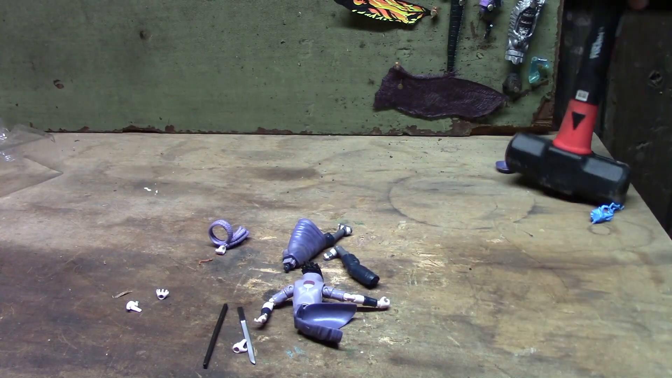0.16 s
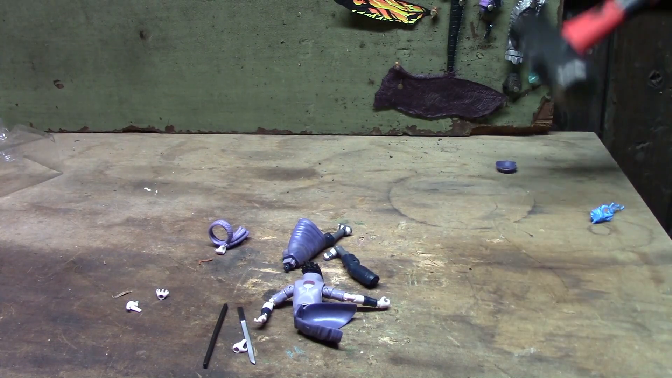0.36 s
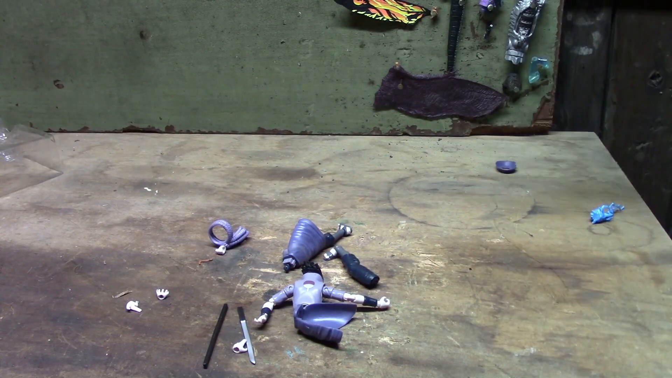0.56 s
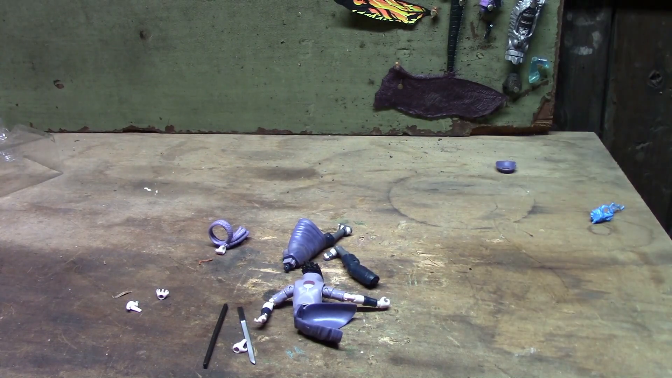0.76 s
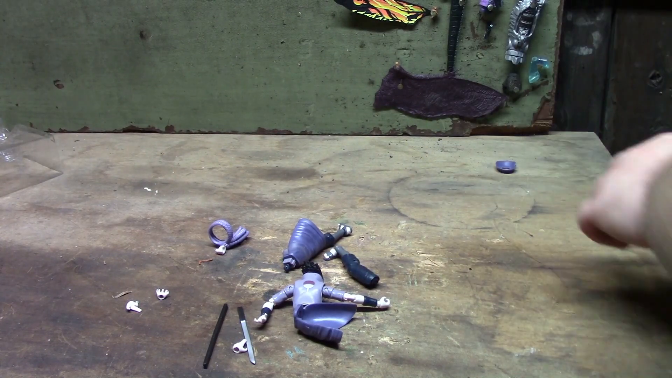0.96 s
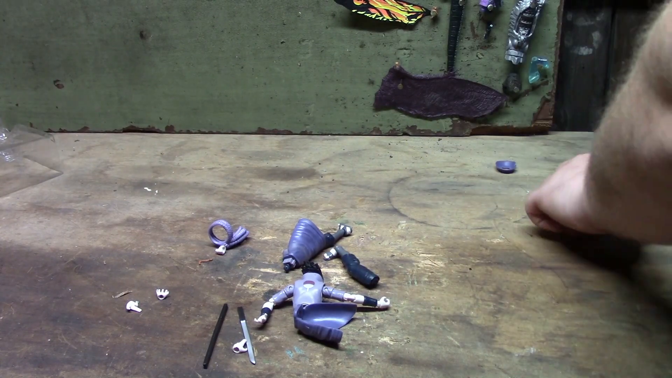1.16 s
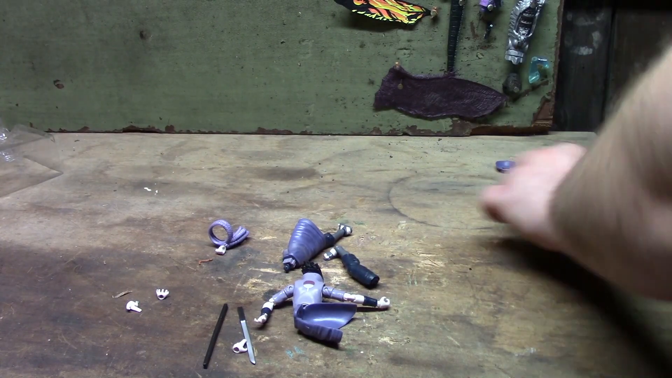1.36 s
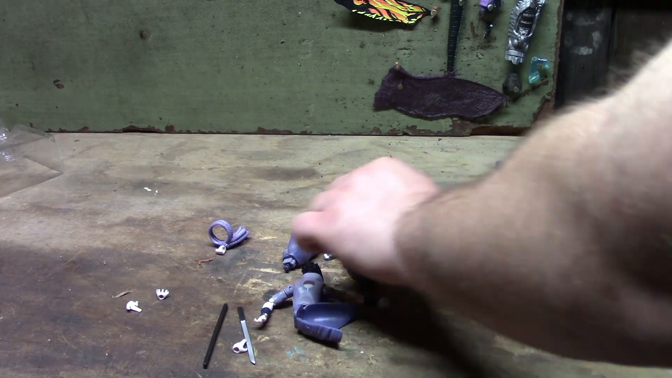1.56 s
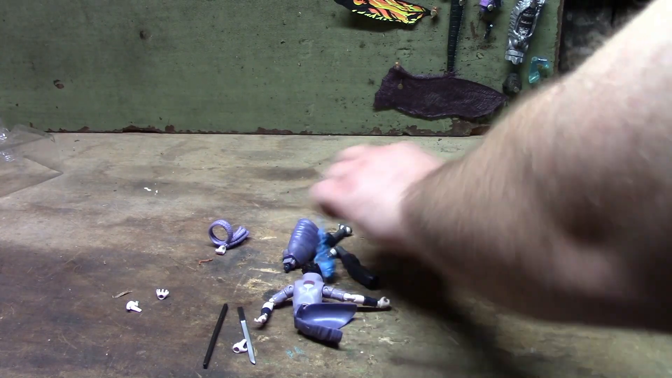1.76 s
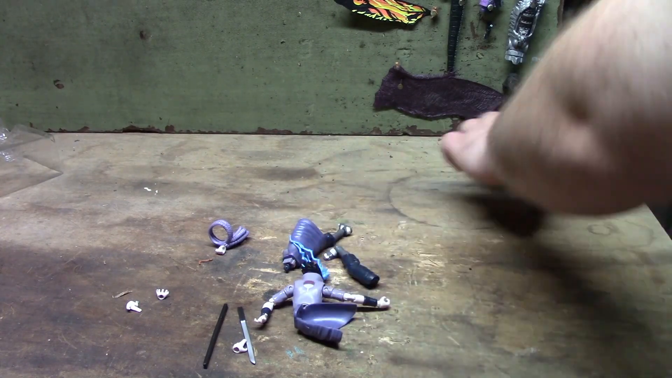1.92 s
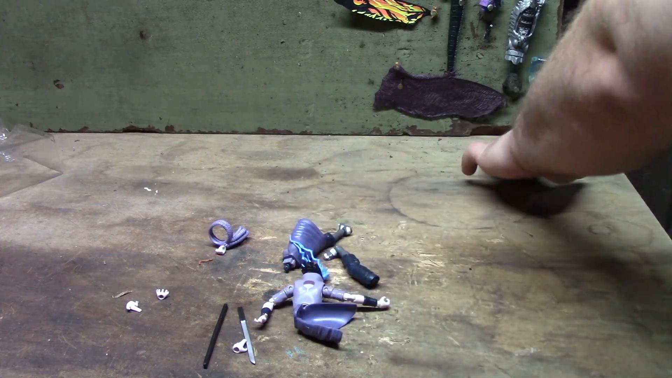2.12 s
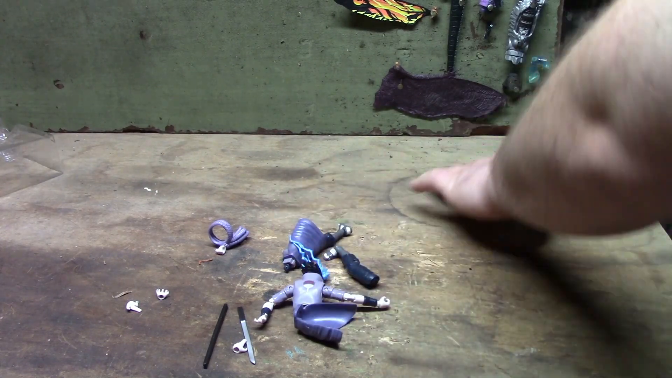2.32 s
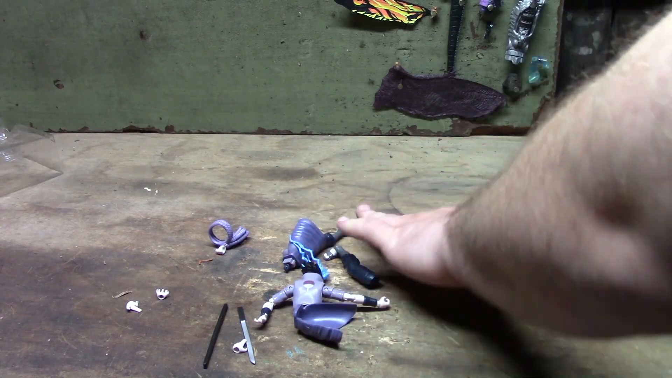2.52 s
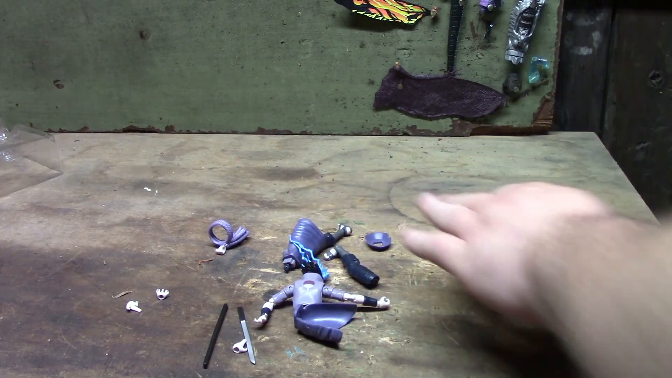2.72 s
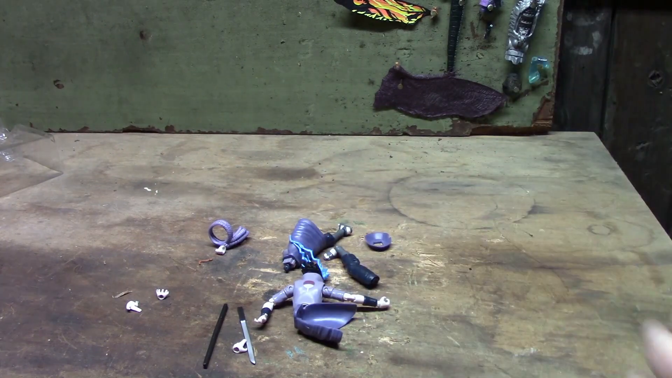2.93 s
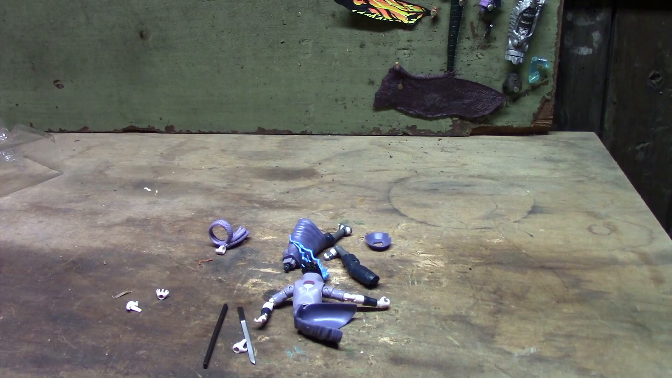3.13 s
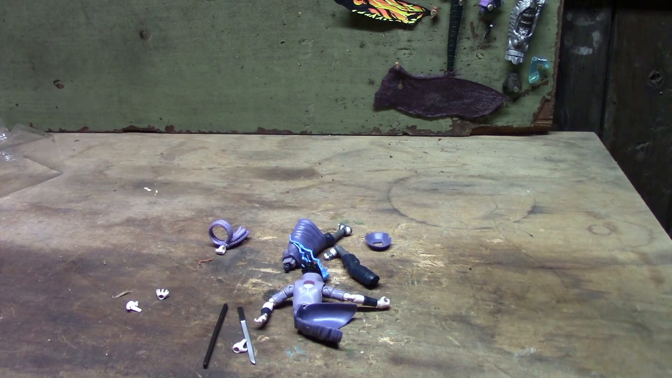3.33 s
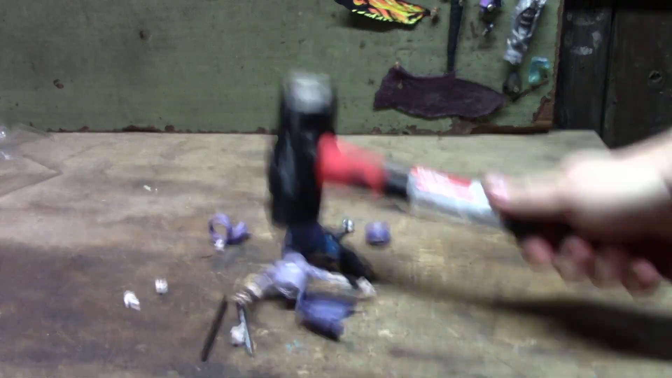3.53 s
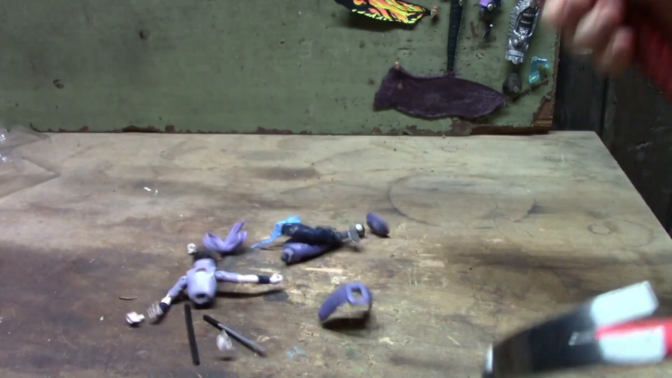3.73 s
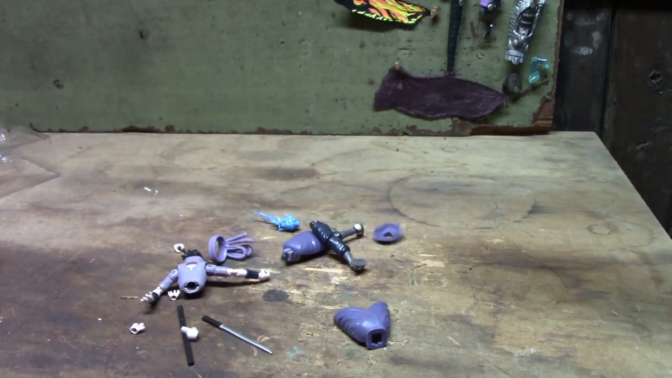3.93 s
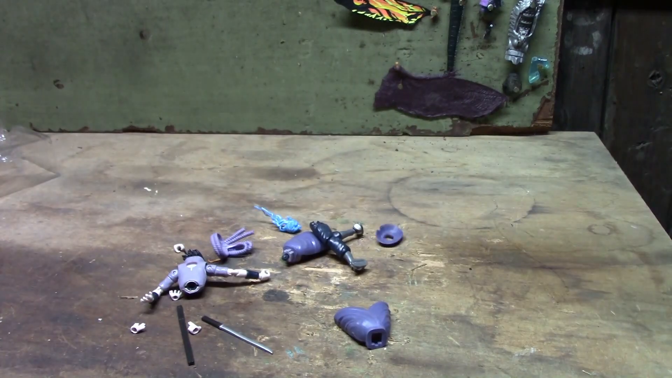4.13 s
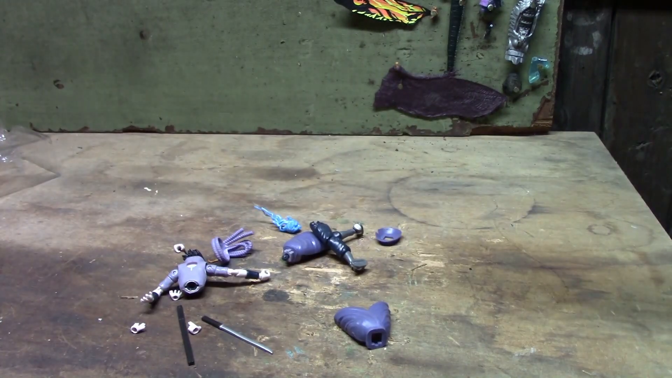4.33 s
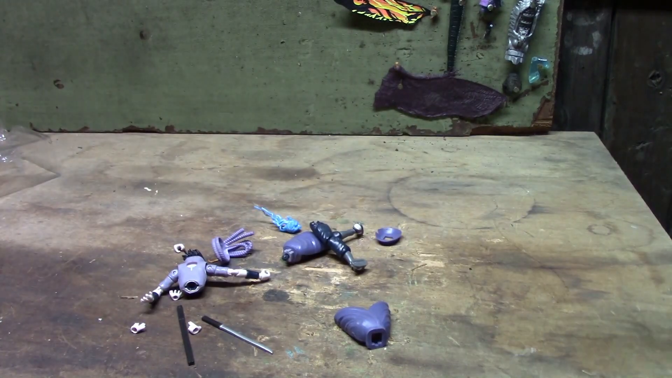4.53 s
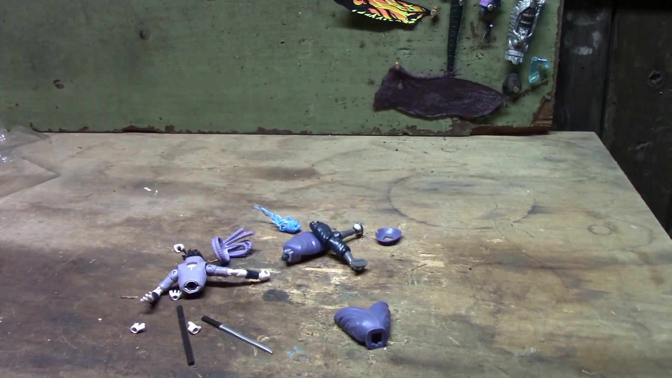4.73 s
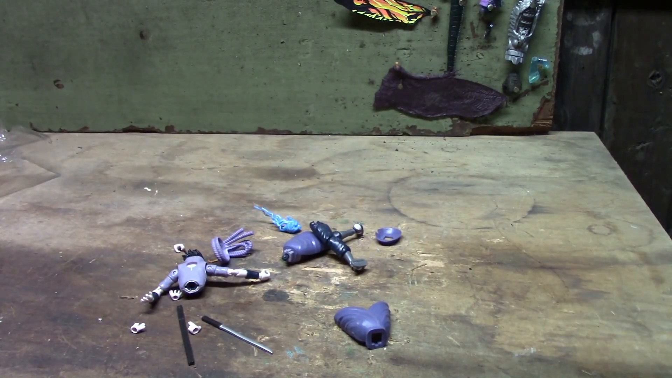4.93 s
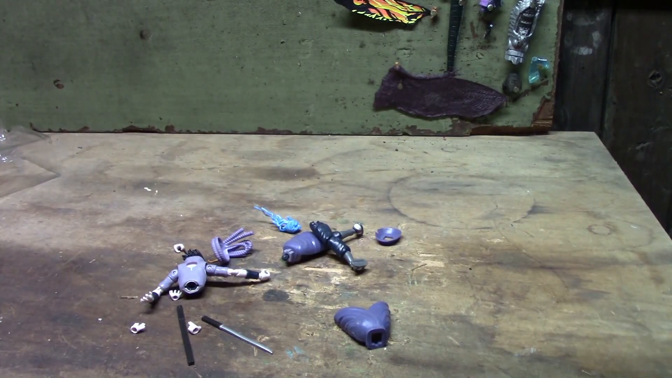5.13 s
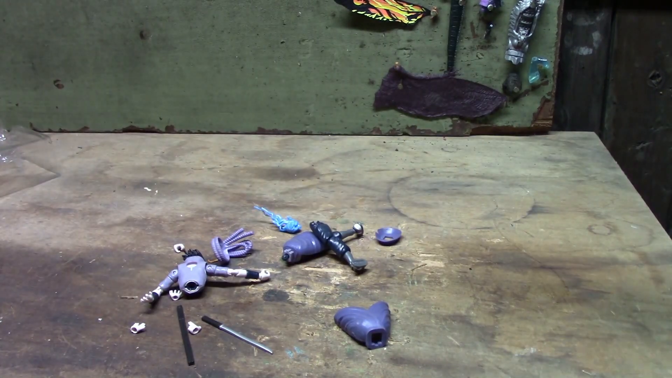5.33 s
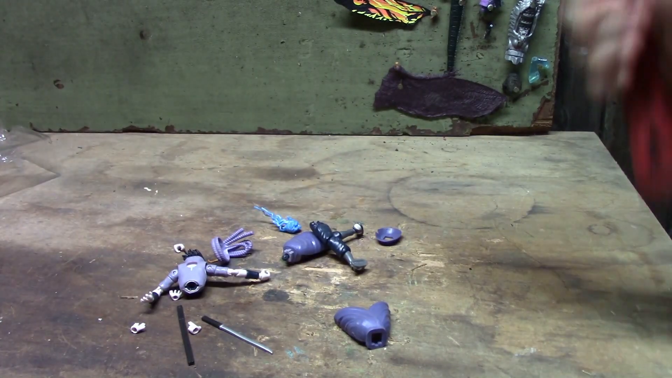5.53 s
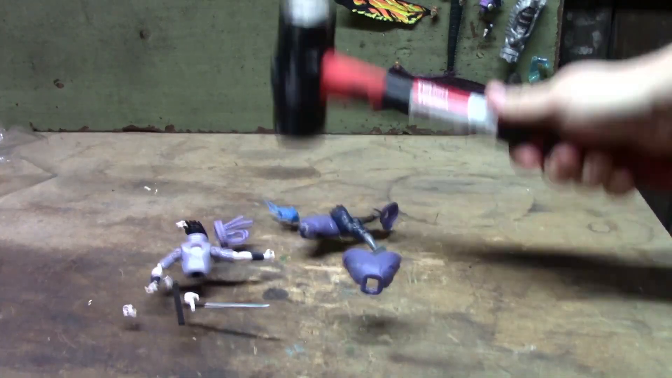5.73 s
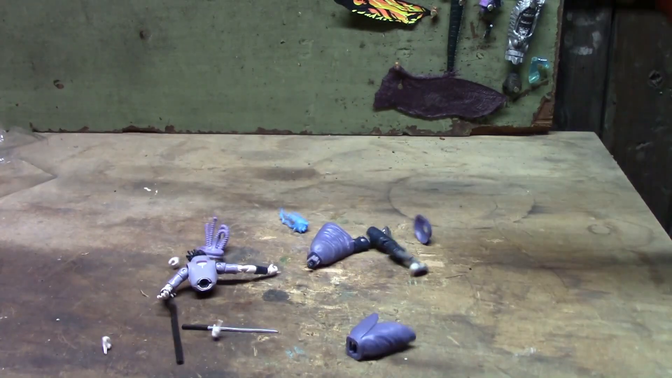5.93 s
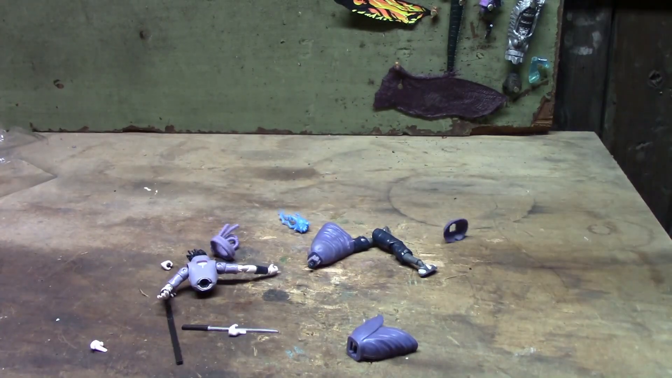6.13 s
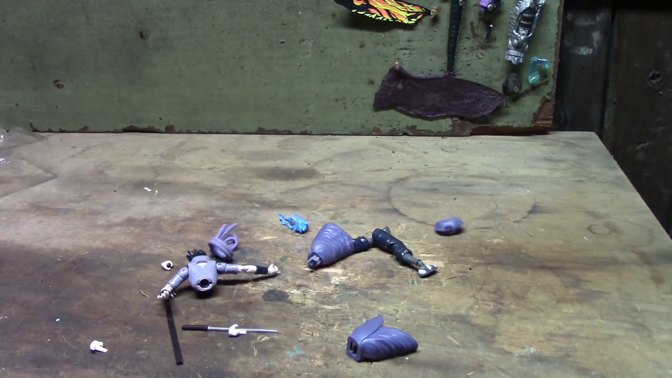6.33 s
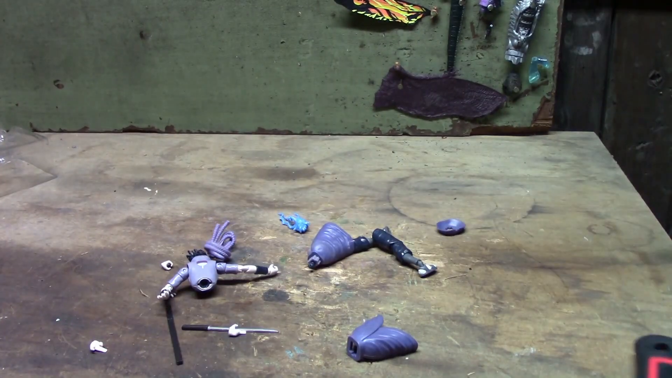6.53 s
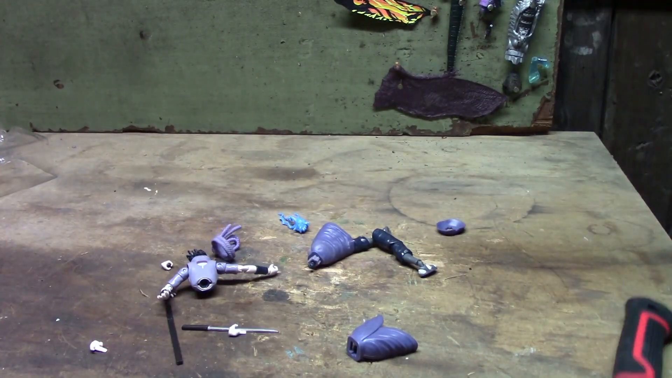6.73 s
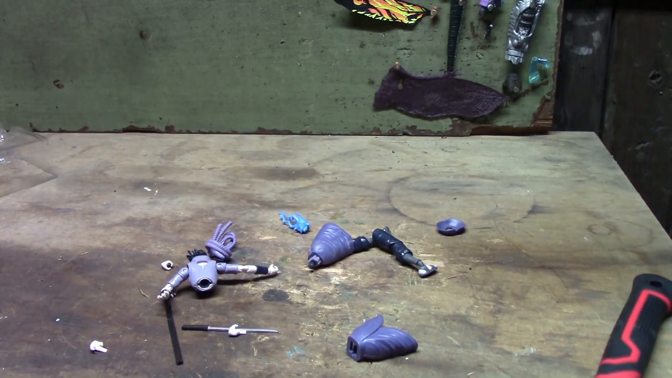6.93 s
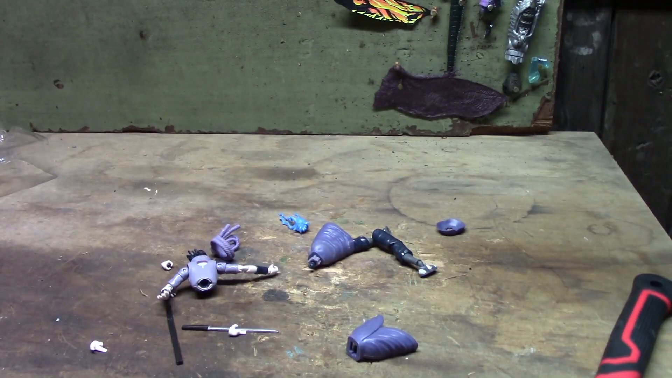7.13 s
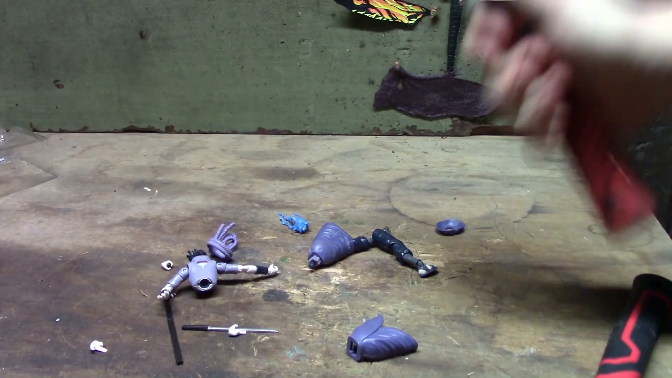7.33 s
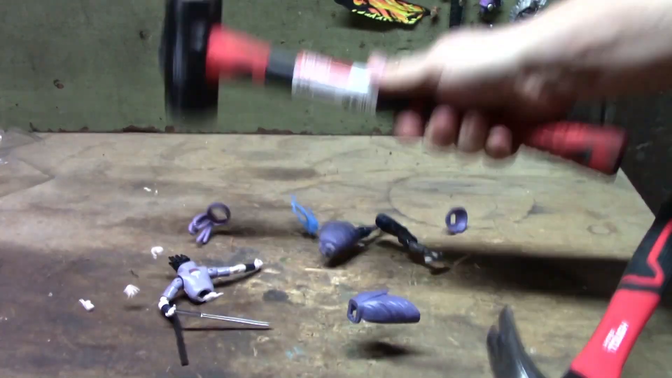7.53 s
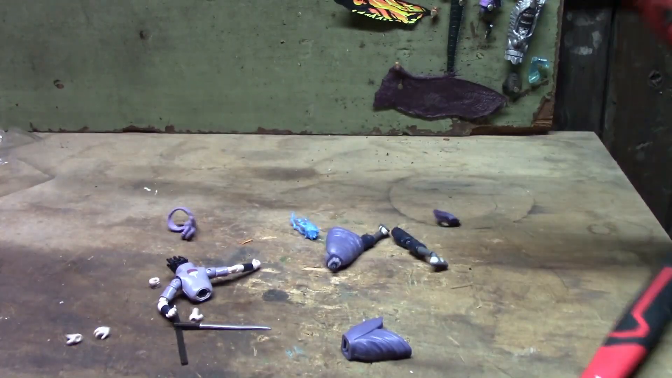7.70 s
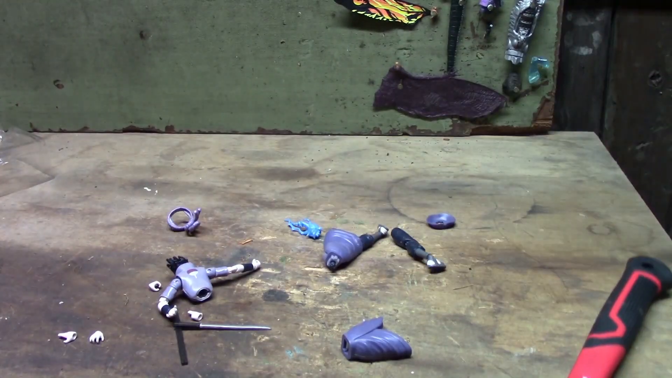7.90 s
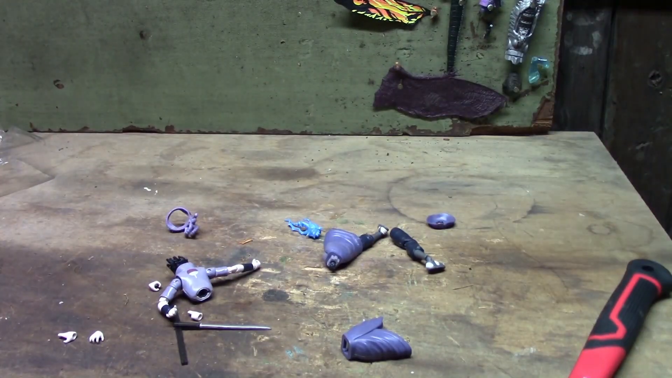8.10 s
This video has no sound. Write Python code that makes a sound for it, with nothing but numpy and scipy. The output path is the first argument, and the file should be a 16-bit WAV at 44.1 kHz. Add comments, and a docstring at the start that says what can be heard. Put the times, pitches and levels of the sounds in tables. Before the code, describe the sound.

A low steady room hush fills a garage. A soft knock on a wooden bench comes at 0.2 s, tiny ticks at 0.7 and 1.4, then faint hand rubbing and two light taps near 1.8. A hand slides over the wood from 2.0, swelling until a small, crisp tap about 2.6. After near silence, a heavy hammer smashes a plastic toy at 3.6: crunch, huge wooden thud, jingling steel tools, and pieces tumbling and knocking until 4.3. Small ticks and a muted clonk follow around 4.7-4.9. The second blow at 5.7 is similar, with less jingle and bouncing debris. A hollow clonk at 6.6 leads into a faint handle scrape and a knock at 6.9. The third blow lands at 7.5, almost without jingle, its fragments clattering to about 8 s. The close microphone compresses and clips at each blow, the room hush recovering quickly.

```python
"""Soft knocks, small ticks and a sliding hand come first: pieces are arranged on a wooden bench in a garage.
A heavy hammer then hits a plastic toy figure three times: bursts of noise crunch, the bench thuds through
its resonances, steel modes jingle, and filtered ticks and knocks make loose things jump, rebound and settle.
Before the last blow the hammer is put down and its handle topples, as scraped noise, against the bench.
All meets at one microphone, where a limiter holds down the booming room and the loudest instants clip."""
import sys
import numpy as np
from scipy import signal
from scipy.fft import rfft, irfft
from scipy.io import wavfile

SR = 44100
rng = np.random.default_rng(int(sys.argv[2]) if len(sys.argv) > 2 else 0)


def dump(signal):
    """Clip the signal to [-1, 1] and save it as 16-bit WAV at the path in sys.argv[1]."""
    limited = np.clip(np.atleast_2d(signal).T, -1, 1)
    pcm = np.round(limited * 32767).astype(np.int16)
    wavfile.write(sys.argv[1], SR, pcm)


N = 359856
TAPS = 8192  # length of the filter design
HZ = np.fft.rfftfreq(TAPS, 1 / SR) + 1  # the offset avoids division by zero
T = np.arange(SR) / SR


def amp(db):
    """Decibels to gain."""
    return 10 ** (np.asarray(db) / 20)


def evened(x):
    """Scales to rms 1."""
    return x / np.sqrt(np.mean(x ** 2) + 1e-20)


def unit_energy(x):
    """Scales to a total energy of 1."""
    return x / np.linalg.norm(x)


def read(points, hz):
    """Reads a curve over frequency on a log-frequency axis."""
    f, value = np.transpose(points)
    return np.interp(np.log(hz + 1), np.log(f + 1), value)


def add(mix, s, sound):
    """Mixes a sound in at time s, cut off at the end of the mix."""
    part = mix[round(s * SR):][:len(sound)]
    part += sound[:len(part)]


def decay(t, t60):
    """Exponential decay that falls 60 dB in t60 seconds."""
    return np.exp(-np.log(1000) * t / t60)


def smooth(x, seconds):
    """One-pole lag."""
    r = np.exp(-1 / (seconds * SR))
    return signal.lfilter([1 - r], [1, -r], x)


def coloured(x, gain):
    """Minimum-phase filter of unit energy, shaped by the given gain on HZ."""
    log_gain = np.log(np.maximum(gain / gain.max(), 1e-5))
    circle = np.concatenate([log_gain, log_gain[-2:0:-1]])
    spectrum = np.exp(np.conj(signal.hilbert(circle)))
    taps = np.fft.ifft(spectrum).real[:TAPS // 2]
    return signal.fftconvolve(x, unit_energy(taps))[:len(x)]


def signs():
    """One second of dense reflections of random sign."""
    return rng.choice([-1., 1.], SR)


def shell(hz, sharpness):
    """Broad resonance of a small piece; higher sharpness narrows it."""
    return 1 / np.hypot(1, sharpness * (HZ / hz - hz / HZ))


# hammer blows on the bench, as they reach the microphone ahead of the limiter:
# (time [s], level [dB], low edge [Hz], high edge [Hz], crack [dB], jingle of steel [dB])
HAMMER_BLOWS = [(3.5762, 26, 344, 1124, -12, -6.5), (5.7074, 26.5, 352, 1170, -14.5, -10),
                (7.5003, 25.5, 337, 1100, -12.5, -29)]
# the shell gives way in stages before the steel meets the wood:
# (time after first touch [s], level relative to the blow [dB])
CRUSH_STAGES = [(0, -4.5), (.003, -17), (.0055, -20)]


def hammer(bottom_s=.0055, crush_hz=3000, crush_t60=0.0031, shove_db=-2, shove_crack_db=-14):
    """Each blow crunches the plastic and shoves the bench at once, then slams the wood and shakes all loose."""
    out = np.zeros(N)
    for s, db, low_hz, high_hz, crack_db, steel_db in HAMMER_BLOWS:
        for delay, under_db in CRUSH_STAGES:
            plastic_colour = shell(crush_hz, 0.32) + shell(1800, 0.25)
            crunch = coloured(signs() * decay(T, crush_t60), plastic_colour)
            add(out, s + delay, amp(db + under_db) * crunch)
        shove = knock(540, 1700, shove_crack_db, wood_t60=0.017, room_db=-23.5, snap_db=-13.5, seat_db=1.5)
        add(out, s, amp(db + shove_db) * shove)
        slam_s = s + bottom_s
        add(out, slam_s, amp(db) * knock(low_hz, high_hz, crack_db, snap_db=10, room_db=-8.0))
        add(out, slam_s, amp(steel_db) * jingle())
        add(out, slam_s, debris())
    return out


# resonances and dips of the bench top: (frequency [Hz], width [Hz], lift [dB])
BENCH_MODES = [(128, 10.7, 7.5), (183, 35, -1.5), (232, 52, 2.5), (317.8, 42, 3.5), (418, 9.1, 6.5),
               (626, 140, 3), (930, 54, 3.5), (1384, 840, 4.5)]
# colour of the sharp part of a contact: (frequency [Hz], relative level [dB])
CRACK_COLOUR = [(30, -10), (300, -32.5), (1500, 6.5), (2800, -4), (5000, -13.5), (7000, -15.5),
                (10000, -25), (16000, -18.5)]


def knock(low_hz, high_hz, crack_db, wood_t60=0.09, room_db=-11, snap_db=1, snap_t60=0.024, low_slope=1.73,
          high_slope=3.87, bench_low_hz=190, ringing=0.52, seat_s=0.0099, seat_db=4):
    """A thud of the bench top, duller for a softer contact, and the crack of the contact itself."""
    lift_db = sum(db / (1 + (2 * (HZ - hz) / width) ** 2) for hz, width, db in BENCH_MODES)
    low_loss = 1 + (low_hz / HZ) ** (2 * low_slope)
    high_loss = 1 + (HZ / high_hz) ** (2 * high_slope)
    wood = amp(lift_db) / np.sqrt(low_loss * high_loss)
    wood = wood / np.hypot(1, (bench_low_hz / HZ) ** 2)  # the top radiates little bass
    crack = amp(crack_db + read(CRACK_COLOUR, HZ))

    board = signs() * decay(T, wood_t60)  # dense modes, different at each knock
    board = board * amp(seat_db * np.minimum(T / seat_s - 1, 0))  # an edge touches first, then the whole face
    board_in_room = signal.fftconvolve(garage(), unit_energy(board))[:SR]
    tail = (garage() + ringing * board_in_room) / np.hypot(1, ringing)
    thud = coloured(board + amp(room_db) * tail, np.hypot(wood, crack))

    crack_share = np.linalg.norm(crack) / np.linalg.norm(wood)
    snap = coloured(signs() * decay(T, snap_t60), crack) * crack_share
    return thud + amp(snap_db) * snap


# steel tools shaken by a blow, the decay being that before the closing fade shortens it: # (frequency [Hz],
# relative level [dB], decay t60 [s])
STEEL_TOOLS = [(845, -18, 2.6), (1580, -24, 2.2), (4145, -11, .5), (5496, -19, 1.2), (7600, -9, .45),
               (12100, -10, .4)]


def jingle(per_s=70, shake_t60=0.74, level_db=-2, detune=.04, count=14):
    """Steel tools chatter against the wall; each touch rings them anew, in clusters of close modes."""
    t = np.arange(2 * SR) / SR
    out = np.zeros(len(t))
    for hz, db, t60 in STEEL_TOOLS:
        touches = signs() * (rng.random(SR) < per_s / SR) * decay(T, shake_t60)
        touches[0] = 1  # the blow itself
        modes = sum(np.sin(2 * np.pi * hz * (1 + detune * off) * t + 2 * np.pi * turn)
                    for off, turn in rng.uniform(-1, 1, (count, 2)))
        ring = decay(t, t60) * modes / np.sqrt(count)
        out += amp(db) * signal.fftconvolve(unit_energy(touches), ring)[:len(t)]
    taper = 1 - (t / t[-1]) ** 2  # the ringing fades smoothly to nothing by the end of two seconds
    return amp(level_db) * out * taper


def debris(level_db=5, fade_db_per_s=75, spread_db=26, low_hz=1800, top_hz=10000, tick_t60=0.033, wet_db=-3,
           small_db_per_octave=-4, count=70):
    """Loose bits skitter after a blow, each ticking at its own pitch; small bits are quieter."""
    out = np.zeros(SR)
    for k, (when, size, force) in enumerate(rng.random((count, 3))):
        s = 0.033 + 0.5 * (k + when) / count  # spread over half a second
        hz = low_hz * (top_hz / low_hz) ** size
        tick = coloured(rng.standard_normal(TAPS) * decay(T, tick_t60)[:TAPS], shell(hz, 3.3))
        small_db = small_db_per_octave * np.log2(hz / low_hz)
        force_db = spread_db * (force ** 2 - 1.0)
        add(out, s, amp(level_db - fade_db_per_s * s + force_db + small_db) * tick)
    return out + amp(wet_db) * signal.fftconvolve(out, unit_energy(garage()))[:SR]


# knocks on the bench: things set down or landing, and the hammer's first touch before the last blow;
# ahead of the limiter: (time [s], level [dB], low edge [Hz], high edge [Hz], crack [dB],
# first rebound after [s] (0 = no rebound), loss per rebound [dB])
BENCH_KNOCKS = [(0.159, -31.5, 444, 1120, -14, 0, 0), (1.792, -29.5, 600, 925, -23, 0, -10),
                (1.869, -22.5, 940, 1310, -19.5, 0, 0), (2.611, -33, 790, 1700, 2.5, 0, 0),
                (3.748, -3, 254, 950, -6.5, .076, 3), (3.8794, 6.5, 345, 845, -20.5, .045, 6),
                (4.0076, 15.5, 694, 1120, -22, .097, 17.5), (5.785, 11.5, 300, 1090, -14.5, .105, 9),
                (6.051, 3.5, 288, 860, -24, .04, 6), (6.325, -21, 302, 700, -21, .042, 5),
                (6.909, -7, 324, 915, -14.5, 0, 0), (6.921, 11, 590, 1030, -21.5, 0, 0),
                (7.4973, -15.5, 700, 1530, 4, 0, 0), (7.596, 6.5, 318, 970, -39, 0, 0),
                (7.715, 2, 600, 1000, -19, .043, 24), (7.776, 10, 820, 1165, -22.5, .056, 5.5),
                (7.967, -7.5, 640, 1090, -33, .06, 4.5)]
# each rebound comes sooner, sounds lower and cracks less than the contact before it
REBOUND_GAP_SHARE, REBOUND_PITCH_SHARE, REBOUND_CRACK_DB = .86, 0.82, -1.5


def clatter(count=3, shortest_hop_s=.02, room_db=-10.5, shake_per_db=0.08, wood_t60=0.062):
    """Lighter knocks: harder ones stir more of the room; what springs back lands twice more, sooner and softer."""
    out = np.zeros(N)
    for s, db, low_hz, high_hz, crack_db, gap_s, loss_db in BENCH_KNOCKS:
        for k in range(count if gap_s > shortest_hop_s else 1):
            lower = REBOUND_PITCH_SHARE ** k
            hit_db = db - k * loss_db
            thud = knock(low_hz * lower, high_hz * lower, crack_db + k * REBOUND_CRACK_DB,
                         wood_t60=wood_t60, room_db=room_db + shake_per_db * hit_db)
            add(out, s, amp(hit_db) * thud)
            s = s + gap_s * REBOUND_GAP_SHARE ** k
    return out


# hollow clonks of the hammer being rested beside the bench, ahead of the limiter:
# (time [s], level [dB], low edge [Hz], high edge [Hz], crack [dB], room [dB])
HAMMER_CLONKS = [(4.8512, -9.5, 480, 880, -35.5, -13.5), (6.5706, 7, 1150, 1670, -21, -11)]


def set_down():
    """The hammer is rested on wood: a soft contact whose spectrum falls steeply at the top."""
    out = np.zeros(N)
    for s, db, low_hz, high_hz, crack_db, room_db in HAMMER_CLONKS:
        clonk = knock(low_hz, high_hz, crack_db, low_slope=0.9, high_slope=7.5, room_db=room_db,
                      bench_low_hz=266, wood_t60=0.048, seat_s=0.0032)
        add(out, s, amp(db) * clonk)
    return out


# the clearest small sounds: bits snapping and landing, tools pinging, a faint brush; ahead of the limiter:
# (time [s], level [dB], pitch [Hz], ring t60 [s], room [dB])
SMALL_SOUNDS = [(0.708, -42.5, 1800, .018, -13), (0.730, -41, 1770, .015, -15),
                (1.411, -37.5, 1770, 0.0083, -20), (1.889, -41.5, 8400, .03, -30),
                (2.161, -32.5, 1700, 0.027, -25), (2.178, -34, 6720, 0.027, -14),
                (3.02, -53.5, 9900, .07, 3), (3.752, -8, 3460, 0.007, -21),
                (3.793, -12.5, 7050, 0.0067, -36), (3.827, -15, 2280, 0.0085, -25),
                (3.961, -16.5, 6730, 0.0055, -20), (4.113, -30, 10200, .055, -1.5),
                (4.261, -38, 5190, 0.052, -12.5), (4.306, -40.5, 4870, .04, -9),
                (4.443, -44, 5880, 0.046, -6), (4.689, -21, 9900, 0.0053, -18.5),
                (4.688, -29, 2490, .025, -9), (4.69, -41, 3620, .2, -11.5), (4.812, -35, 1530, .01, -13),
                (4.969, -41.5, 4600, .012, -14), (5.894, -13.5, 6800, 0.017, -11.5),
                (5.98, -25, 6660, 0.0074, -22), (6.091, -32, 7400, 0.26, 5),
                (6.149, -27.5, 9900, 0.011, -14), (6.205, -35.5, 5000, .04, -4),
                (6.323, -32.5, 7000, .008, -23), (6.341, -41, 6240, .3, -26),
                (7.489, -32, 5000, 0.023, -19), (7.653, -11, 3400, 0.008, -32),
                (7.684, -32, 12100, .15, -30), (7.775, -10, 6800, 0.044, -43)]


def small_sounds(sharpness=0.81, ring_db=-3, ring_q=22, ringing_s=0.4):
    """Each is a tick round its own pitch and a cluster of close modes; those that ring long tick less."""
    out = np.zeros(N)
    for s, db, hz, t60, room_db in SMALL_SOUNDS:
        contact = signs() * decay(T, min(t60, .04)) + amp(room_db) * garage()
        tick = coloured(contact, shell(hz, sharpness) ** 2)
        ring = coloured(signs() * decay(T, t60), shell(hz, ring_q) ** 2)
        add(out, s, amp(db) * (tick / (1 + (t60 / ringing_s) ** 2) + amp(ring_db) * ring))
    return out


def settling(after_s=.3, every_s=0.049, level_db=-29, fade_db_per_s=36, hz=6500, tick_t60=0.005, room_db=-11,
             count=12):
    """The last bits rock to rest after each blow, in ever fainter ticks."""
    out = np.zeros(N)
    for blow_s, *_ in HAMMER_BLOWS:
        for k, (when, size) in enumerate(rng.random((count, 2))):
            s = every_s * (k + when)
            contact = signs() * decay(T, tick_t60) + amp(room_db) * garage()
            tick = coloured(contact, shell(hz * 2 ** (size - .5), 1.3) ** 2)  # within half an octave of hz
            add(out, blow_s + after_s + s, amp(level_db - fade_db_per_s * s) * tick)
    return out


def slide(curve, colour, level_db, grain=0.67, per_s=300, wet=0.46, flutter_db=2.5, flutter_s=0.00466,
          fizz_db=0, fizz_hz=8200, fizz_power=1.84):
    """Friction: a hiss that sticks and slips, with tiny catches on the grain of the wood."""
    s, db = np.transpose(curve)
    flutter = flutter_db * evened(smooth(rng.standard_normal(N), flutter_s))
    pressure = amp(np.interp(np.arange(N) / SR, s, db, left=-120, right=-120))
    catches = evened(rng.standard_normal(N) * (rng.random(N) < per_s / SR))
    drive = amp(flutter) * (rng.standard_normal(N) + grain * catches)
    rub = pressure * evened(coloured(drive, amp(read(colour, HZ))))
    fizz = pressure ** fizz_power * coloured(drive, shell(fizz_hz, 2.3))  # harder rubbing is brighter
    rub = rub + amp(fizz_db) * fizz
    return amp(level_db) * (rub + wet * signal.fftconvolve(rub, unit_energy(garage()))[:N])


def stroke(start, length, db, swell_db_per_s, touch_s=.012, lift_s=0.019, off_db=35):
    """Pressure of one stroke as (s, dB): the hand touches down, leans in or eases off, and lifts."""
    end, end_db = start + length, db + swell_db_per_s * length
    return [(start - touch_s, db - off_db), (start, db), (end, end_db), (end + lift_s, end_db - off_db)]


# strokes of a hand over the bench: (start [s], length [s], relative level at the start [dB], swell [dB/s])
HAND_STROKES = [(1.554, 0.25, -43, -13), (2.036, 0.46, -43.5, 45.5), (2.513, 0.041, -13, -200)]
# colour of the hand on wood: (frequency [Hz], relative level [dB])
HAND_ON_WOOD = [(40, -60), (100, -42), (250, -18), (500, -3.5), (1100, 0), (1750, 2), (3200, -7),
                (6000, -9), (8500, -7), (13000, -21), (16000, -27)]


def hand():
    """A hand slides over the wood, its friction noise following the pressure of each stroke."""
    pressure_curve = [point for row in HAND_STROKES for point in stroke(*row)]
    return slide(pressure_curve, HAND_ON_WOOD, level_db=-12)


# the toppling handle scraping along the bench edge: (time [s], relative level [dB])
HANDLE_SCRAPE = [(6.6, -42), (6.68, -40.5), (6.78, -39.5), (6.86, -45), (6.91, -38)]
# colour of the handle on wood: (frequency [Hz], relative level [dB])
HANDLE_ON_WOOD = [(500, -32), (2000, -2.5), (4200, 4), (6500, 0), (9000, -7), (15000, -20)]


def handle():
    """The toppling handle scrapes along the edge, with the same friction as the hand but another colour."""
    return slide(HANDLE_SCRAPE, HANDLE_ON_WOOD, level_db=-2.5)


def aftersound(level_db=-22, t60=1.89, hz=850, sharpness=0.85):
    """Shelves and tins round the garage hum on faintly after each blow, as decaying band noise."""
    out, t = np.zeros(N), np.arange(2 * SR) / SR
    for s, *_ in HAMMER_BLOWS:
        hum = evened(coloured(rng.standard_normal(len(t)), shell(hz, sharpness) ** 2))
        add(out, s, amp(level_db - 60 * t / t60) * hum)
    return out


# reverberation of the garage: (frequency [Hz], decay t60 [s])
GARAGE_DECAY = [(110, 0.57), (200, 0.48), (400, 0.49), (900, 0.42), (2200, 0.37), (6000, 0.31),
                (15000, 0.093)]


def garage(build_s=0.0068):
    """The room's tail: it builds up quickly, and each band dies at its own speed."""
    hz, t, bands = signal.stft(signs(), SR, nperseg=256)
    fading = bands * decay(t, read(GARAGE_DECAY, hz)[:, None])
    tail = signal.istft(fading, SR, nperseg=256)[1][:SR]
    return tail * (1 - np.exp(-T / build_s))


# colour of the quiet garage at the microphone: (frequency [Hz], relative level [dB])
AIR_COLOUR = [(12, -39), (20, -7.5), (96, -15), (206, -2), (251, -3.5), (305, 0), (566, 0.5), (634, -1),
              (816, 0), (1020, -3.5), (1560, -5), (3140, -12), (12800, -19), (15200, -25), (16500, -55)]
AIR_DB = -54.5  # rms ahead of the limiter


def air():
    """Steady hush of the room: noise shaped by one fixed spectrum."""
    shape = amp(read(AIR_COLOUR, np.fft.rfftfreq(N, 1 / SR)))
    return amp(AIR_DB) * evened(irfft(rfft(rng.standard_normal(N)) * shape, N))


def scene():
    """Everything at the one microphone."""
    blows = hammer() + aftersound()
    contacts = clatter() + set_down()
    ticks = small_sounds() + settling()
    rubs = hand() + handle()
    return (blows + contacts + ticks + rubs + air())[None]


EDGE_HZ = 16100  # top of the band


def record(dry, limit_db=-9, recover_db_per_s=240, sense_s=0.0056, attack_s=0.000053, low_cut_hz=85,
           dull_hz=12000):
    """A limiter clamps each hit and recovers fast; peaks that slip through clip; both band ends roll off."""
    power_db = 10 * np.log10(smooth(dry[0] ** 2, sense_s) + 1e-12)
    fall = np.arange(N) / SR * recover_db_per_s
    held_db = np.maximum.accumulate(power_db + fall) - fall  # rises at once, falls at the recovery rate
    over_db = np.maximum(held_db - limit_db, 0)
    limited = np.clip(dry[0] / amp(smooth(over_db, attack_s)), -.95, .95)
    band = signal.butter(1, [low_cut_hz, min(dull_hz, .45 * SR)], "band", fs=SR, output="sos")
    edge = signal.firwin(255, EDGE_HZ, window=("kaiser", 9), fs=SR)
    return signal.oaconvolve(signal.sosfilt(band, limited), edge, "same")[None]


dry = scene()
out = record(dry)
dump(out)
```